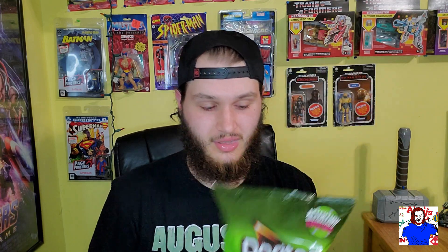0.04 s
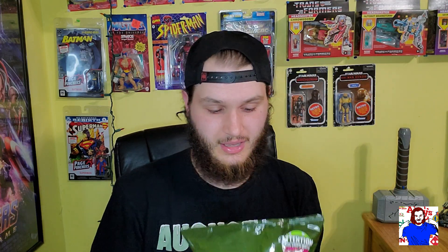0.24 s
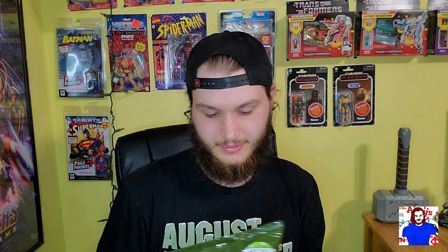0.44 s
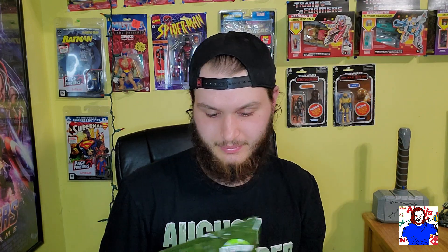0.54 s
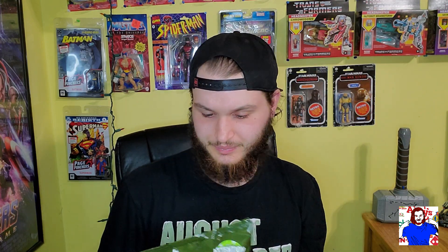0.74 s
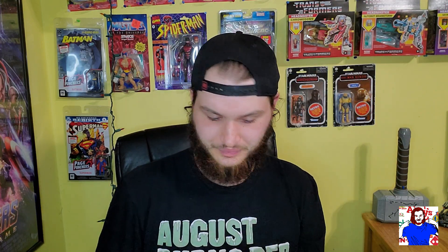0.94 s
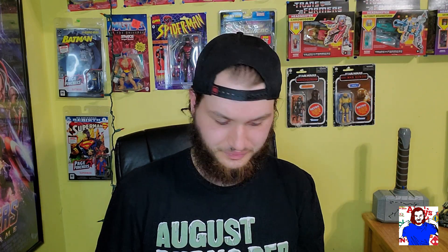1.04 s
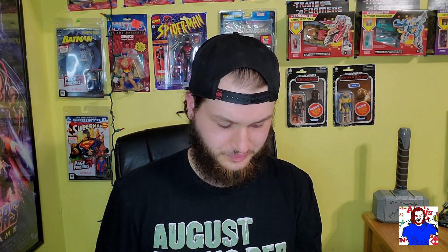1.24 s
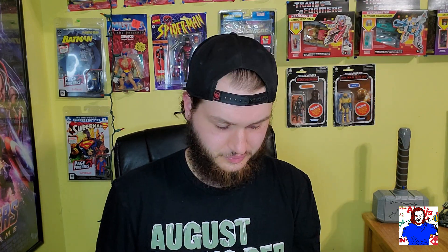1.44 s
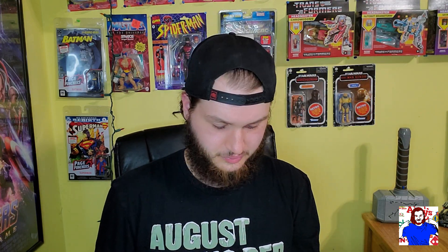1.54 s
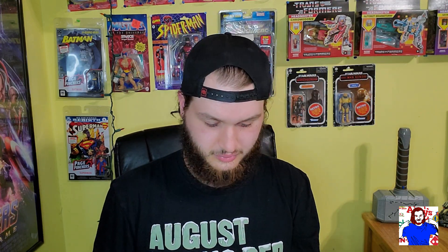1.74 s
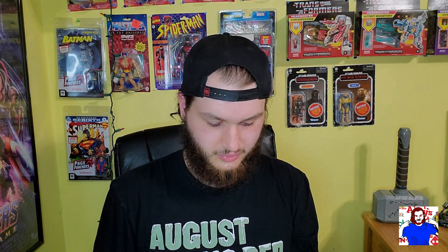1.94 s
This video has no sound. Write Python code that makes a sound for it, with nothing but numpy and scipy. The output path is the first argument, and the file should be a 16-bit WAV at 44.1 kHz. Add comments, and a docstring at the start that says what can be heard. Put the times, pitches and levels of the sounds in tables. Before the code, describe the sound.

A foil snack bag slides softly, then is squeezed in several uneven bursts of sharp crackles, fine rustle and hollow pops, with brief lulls between; close and dry in a small quiet room.

```python
"""Foil snack bag gripped and crumpled

A foil snack bag is lowered and gripped in a few squeezes, close up in a small room.
Creases snap as short noise bursts with a sharp crack, and ringing modes make the panel beside them pop.
Random grains give the crackle of tiny wrinkles and the rustle of the body; whole sides buckle with low pops.
Decaying sines ring as taut facets, wavering tones squeak, and soft noise is the slide and the room tone."""
import sys
import numpy as np
from scipy import signal
from scipy.fft import rfft, irfft, next_fast_len
from scipy.io import wavfile

SR = 44100
rng = np.random.default_rng(int(sys.argv[2]) if len(sys.argv) > 2 else 0)


def unload_wav(signal):
    """Save mono or channel-first audio to the path in sys.argv[1] as 16-bit WAV at rate SR, clipped to [-1, 1]."""
    wavfile.write(
        sys.argv[1],
        SR,
        np.round(np.clip(np.atleast_2d(signal).T, -1, 1) * 32767).astype(np.int16),
    )


N = 88200

# Tone of the bag's body, also the spectrum of the squeaks' waver. Each row: frequency in Hz, level in dB.
BODY_TONE = [(25, -46), (70, -13.5), (125, -1), (175, -8), (250, -1), (330, 1.5), (560, 0), (750, -5.5),
             (1300, -8), (2500, -10.5), (6000, -47)]

# Trims added to the levels in the tables, in dB
CRACK_DB, POP_DB, WRINKLE_DB, BODY_DB, BUCKLE_DB, FACET_DB = 1, -3.5, -4.5, -2, 0, -0.5
PUFF_DB = -11.5  # air pushed by a popping panel, relative to the pop
POP_WALLS_DB = -1  # pops carry less into the room than cracks
FIRST_SLIP = 3.7  # size of the slip that starts a snap, relative to the scale of those that follow
PANEL_CYCLES, BUCKLE_CYCLES = 10.8, 9  # cycles in which a mode's decay reaches -60 dB
PANEL_SCATTER = 0.032  # random spread of the mode ratios
PANEL_RISE_CYCLES = 0.23  # time constant of a mode's onset
WRINKLES_PER_S, WRINKLE_SPREAD_DB = 1500, 3.5
FLEXES_PER_S, FLEX_SPREAD_DB = 330, 2.5
GRIP_FADE_S = 0.019  # time constant of the fade outside a level curve
FACET_T60_S = 0.028
SQUEAK_HALF_S, SQUEAK_WOBBLE = 0.0039, .012  # time from peak to 1/e; rms share by which the pitch wavers
NEAR_DB, NEAR_DELAY_S, NEAR_T60_S = -6, .003, 0.044  # near surfaces answer first
WALLS_DB, WALLS_DELAY_S, WALLS_T60_S = -8, .007, .22  # then the walls
FLOOR_DB = -58.5  # rms of the room tone
CEILING = .9  # full-scale limit that rounded peaks approach
CUTOFF_HZ = 15900


def snaps():
    """A crease flips in a burst of slips, with a pop and a puff of air; the walls get an even click."""
    # Each row: start in seconds, crack energy in dB, crack pitch in Hz, its top octave relative to it in dB,
    # crack length in ms (slips down by 4 dB), panel pop energy in dB, panel pitch in Hz,
    # extra level sent to the walls in dB. Crack and pop energies are ahead of their trims.
    snap_rows = [(0.0604, -26.5, 7580, -6, 0.26, -33, 1410, 6), (0.22, -21, 3130, -10, 4.3, -5.5, 880, 8),
                 (0.2316, -12, 2790, -14, 0.3, -6, 1310, 8), (0.2353, -0.5, 4200, -16, 3, -3, 1310, -10),
                 (0.242, 7.5, 5270, -21, 1.2, 0, 1140, 6.5), (0.247, -2, 6090, -9, 0.5, -3, 1010, 8),
                 (0.3314, -15.5, 1690, -20, 1.7, -1.5, 1160, 4),
                 (0.3513, -15.5, 1500, -24, 0.63, -4, 680, -2), (0.359, -31, 1800, -20, 0.8, -8, 900, 2),
                 (0.478, -15, 3500, -7, 2.4, -5, 844, 9), (0.378, -7.5, 2900, -16, 2.5, 2.5, 1270, 4),
                 (0.495, -5.5, 3960, -13, 0.44, 1.5, 790, 4), (0.5191, -9.5, 3650, -10, 2.2, -3, 1290, 8),
                 (0.5339, 0, 3800, -9, 0.76, -6.5, 610, 5), (0.554, 3, 4950, -13, 1.5, 1, 1380, -3),
                 (0.573, -8, 5860, -11, 0.8, -5, 725, 9), (0.5894, -3.5, 5600, -13, 1.3, -7, 850, -10),
                 (0.6197, 6, 5300, -7.5, 0.27, 3.5, 816, 0.5), (0.628, -1.5, 5750, -13, 1.1, -5, 1290, -3),
                 (0.6414, -16, 2800, -14, 1, 2.5, 1030, -8), (0.6345, -5, 6000, -9, 1.0, -5, 730, -7),
                 (0.6508, -4, 6190, -7, 0.23, 0, 554, -7), (0.683, -3.5, 5100, -11, 0.5, 2, 517, -14),
                 (0.6857, -10, 4380, -18, 2.1, -2.5, 740, 7), (0.8074, -13, 5400, -8.5, 0.8, -18, 1470, 7),
                 (0.8435, 6, 3860, -7, 0.23, -4, 1010, 2), (0.8613, 7.5, 3900, -7.5, 1.4, -7, 650, -10),
                 (0.868, 3, 6390, -15, 1.5, 1.5, 457, 4), (0.8868, 6.5, 5280, -14, 3, -18, 615, 1.5),
                 (0.89, -2, 4500, -19, 0.35, 5, 870, 2), (0.9302, -15, 4000, -10, 1.2, -15, 1200, -10),
                 (0.9715, -4, 3800, -10.5, 2.4, -1.5, 1320, 7),
                 (1.0139, -1, 5880, -21, 1.8, -2.5, 754, 2.5), (1.077, -16, 4540, -17, 2, -5.5, 774, -3),
                 (1.145, -24, 1940, -9, 1.6, -12, 470, 15), (1.1578, -14, 5640, -5, 1.1, -14, 746, 10),
                 (1.2093, -20, 3210, -19.5, 0.5, -9, 1520, 3), (1.215, -10.5, 5680, -8, 0.26, -26, 463, -6),
                 (1.242, 3.5, 4470, -6, 0.2, 5, 3400, -3), (1.2635, 3, 5470, -30, 0.24, -12, 880, 7.5),
                 (1.297, 1, 3830, -26, 0.98, 0, 685, 5), (1.3076, -5, 3970, -4, 2.8, 3, 1240, -10),
                 (1.318, 0.5, 3930, -26, 1.2, 5, 714, 4.5), (1.3574, 3.5, 5300, -14, 0.35, 1.5, 910, -16),
                 (1.3714, -2.5, 5300, -12, 0.37, -14, 745, -7), (1.3744, 5.5, 3500, -22, 6, 7, 553, -14),
                 (1.3871, 4.5, 5330, -9, 0.84, 11.5, 1200, -1.5), (1.39, 2, 2760, -5, 0.27, -10, 630, 10),
                 (1.3952, 10, 4130, -15, 0.69, -10, 580, -5.5), (1.4021, -17, 4910, -7, 1.2, 1, 1250, 10),
                 (1.4194, -2, 5920, -8, 0.94, 2.5, 910, -4), (1.4264, 6.5, 5750, -15, 2.5, 5, 1290, 5.5),
                 (1.433, -11, 4910, -8, 1.1, 4, 550, 6), (1.5114, -37, 2680, -31, 1.2, -3, 1460, 12),
                 (1.5404, 4.5, 4930, -20, 0.32, -3, 2080, 2.5), (1.5927, 3, 4530, -13, 1.6, -6.5, 1075, 3),
                 (1.5951, -5, 5420, -21, 1, 7.5, 1174, -10), (1.6374, -21, 3450, -16, 1.6, -1.5, 1650, -8),
                 (1.665, -16, 3550, -17, 0.82, 5.5, 1240, 2),
                 (1.6672, -1.5, 3430, -22, 0.97, 4.5, 1300, 8.5), (1.6945, 2, 4030, -5.5, 2, 8, 1580, 2.5),
                 (1.7163, -0.5, 4510, -4.5, 0.5, 7, 1500, -4), (1.7287, 1, 4400, -12, 2.1, 4, 1750, 1.5),
                 (1.7641, -7, 2950, -18, 2.2, 2.5, 780, -1), (1.836, -1, 4100, -33, 0.79, 1, 1380, -0.5),
                 (1.8996, -25, 2810, -20, 1.7, -11.5, 1780, 5.5)]
    # Modes of a panel. Each row: ratio to the panel pitch, level in dB.
    panel_modes = [(0.159, -19.5), (0.332, -12), (0.581, -5.5), (0.879, -3), (1.06, 1.5), (1.35, -5.5),
                   (1.9, -7.5)]
    # Tone of the air in the bag. Each row: frequency in Hz, level in dB.
    puff_tone = [(30, -24), (70, -7), (130, -4), (200, 5), (330, 4.5), (500, 6), (800, -5), (2000, -42),
                 (8000, -62)]
    out = np.zeros(N)
    t = np.arange(SR // 25) / SR
    click = (t == 0) * 1.0
    for s, crack_db, crack_hz, top_db, length_ms, pop_db, panel_hz, walls_db in snap_rows:
        fade = np.exp(-(t * 1000 / length_ms / 1.45) ** 2)
        slips = rng.standard_normal(len(t)) * fade + FIRST_SLIP * click
        crack_gain = from_db(CRACK_DB + crack_db)
        sharp = crack_gain * crack(slips, crack_hz, top_db)
        even = crack_gain * crack(click, crack_hz, top_db)
        puff = rng.choice([-1, 1]) * from_db(PUFF_DB) * unit(colour(click, puff_tone))
        hollow = from_db(POP_DB + pop_db) * (pop(t, panel_hz, panel_modes, PANEL_CYCLES) + puff)
        to_walls = from_db(walls_db) * (even + from_db(POP_WALLS_DB) * hollow)
        add(out, s, in_room(sharp + hollow, to_walls))
    return out


def crack(slips, pitch_hz, top_db):
    """The film's answer to a burst of slips: a broad peak at the crease's pitch and a fizzing top."""
    # Broad peak of the film. Each row: ratio to the crack's pitch, level in dB.
    film_peak = [(.01, -52), (.035, -14.5), (.11, -12), (.27, -4.5), (.55, -1), (1.0, 1), (1.6, -2.5),
                 (2.0, -3), (2.6, -14), (4.0, -23)]
    # Top octave of a crack. Each row: frequency in Hz, level in dB.
    fizz = [(5000, -27.5), (8500, -11), (10500, 7), (13000, 4), (16000, -9.5)]
    spectrum = [(ratio * pitch_hz, db) for ratio, db in film_peak]
    return unit(colour(slips, spectrum)) + from_db(top_db) * unit(colour(slips, fizz))


def pop(t, pitch_hz, modes, cycles):
    """A panel swings to a new shape and its modes ring for a few cycles; energy 1."""
    out = 0
    for ratio, db in modes:
        hz = pitch_hz * ratio * np.exp(PANEL_SCATTER * rng.standard_normal())
        swing = (1 - np.exp(-t * hz / PANEL_RISE_CYCLES)) * from_db(-60 * t * hz / cycles)
        # the slope of the motion is what sounds
        ring = np.diff(swing * np.sin(2 * np.pi * (hz * t + rng.random())), prepend=0)
        out = out + from_db(db) * unit(ring)
    return unit(out)


def rustle(count=3):
    """Bright ticks of small wrinkles and duller flexes of the body, from a few patches that follow the hands."""
    # How hard the bag is worked, one curve per grip. Each row: time in seconds,
    # level of the wrinkles in dB, level of the body's rustle in dB, both ahead of their trims.
    grips = [
        [(.218, -44, -53.5), (.24, -23, -25.5), (.255, -37, -34), (.29, -43, -39), (.35, -42, -44.5),
         (.44, -41.5, -46)],
        [(.46, -34.5, -38), (.52, -27.5, -30.5), (.63, -23.5, -28.5), (.71, -32.5, -36), (.79, -37.5, -48.5)],
        [(.81, -33.5, -42), (.865, -25, -25.5), (.91, -30, -61), (.96, -38.5, -38.5), (1.04, -41.5, -38),
         (1.11, -47.5, -50.5)],
        [(1.15, -43, -48), (1.23, -44.5, -39), (1.28, -29.5, -33.5), (1.36, -40, -28.5), (1.405, -18, -19),
         (1.44, -21, -32), (1.475, -31.5, -39)],
        [(1.55, -38, -54), (1.62, -31.5, -38), (1.69, -49, -33), (1.74, -38, -61), (1.81, -66, -40),
         (1.92, -68, -53.5)],
    ]
    # Tone of the small wrinkles. Each row: frequency in Hz, level in dB.
    wrinkle_tone = [(40, -60), (400, -18), (1200, 6), (2200, 2.6), (3500, 1), (5500, -1), (7800, 0),
                    (10000, -10), (13000, -6.5), (16000, -13)]
    out = np.zeros(N)
    wrinkling = np.max([level(grip, 1) for grip in grips], axis=0)
    flexing = np.max([level(grip, 2) for grip in grips], axis=0)
    for patch in range(count):
        ticks = grains(WRINKLES_PER_S / count, WRINKLE_SPREAD_DB)
        wrinkles = from_db(WRINKLE_DB) * wrinkling * unit(colour(ticks, wrinkle_tone))
        flexes = grains(FLEXES_PER_S / count, FLEX_SPREAD_DB)
        body = from_db(BODY_DB) * flexing * unit(colour(flexes, BODY_TONE))
        add(out, 0, in_room(wrinkles + body, wrinkles + body))
    return out * np.sqrt(N / count)  # from energy 1 per patch to a joint rms


def grains(per_s, spread_db):
    """Random clicks of either sign, many small and few large."""
    sizes_db = spread_db * np.minimum(rng.exponential(1, N), 4)
    sizes = from_db(sizes_db) * rng.choice([-1, 1], N)
    return sizes * (rng.random(N) < per_s / SR)


def buckles():
    """A whole side of the bag buckles with a large, low, hollow pop."""
    # Each row: start in seconds, energy in dB ahead of the trim, pitch in Hz.
    buckle_rows = [(0.227, -11, 166), (0.243, -7, 239), (.332, -13, 480), (.494, -12, 404), (.533, 1, 500),
                   (.693, -5, 525), (.859, 5, 326), (.886, 4, 302), (0.9, -7.5, 192), (.948, -7.5, 245),
                   (1.076, -7, 326), (1.146, -12.5, 260), (1.254, -5.5, 390), (1.278, -8, 395),
                   (1.298, 0, 377), (1.343, -7.5, 320), (1.374, 4, 330), (1.396, 4, 373), (1.429, 0.5, 406),
                   (1.544, -13.5, 254)]
    # Modes of a side. Each row: ratio to the buckle's pitch, level in dB.
    side_modes = [(.42, -12), (.85, -2.5), (1.02, 2.5), (1.4, -14.5), (1.75, -8.5)]
    out = np.zeros(N)
    t = np.arange(SR // 10) / SR
    for s, db, pitch_hz in buckle_rows:
        thump = from_db(BUCKLE_DB + db) * pop(t, pitch_hz, side_modes, BUCKLE_CYCLES)
        add(out, s, in_room(thump, from_db(POP_WALLS_DB) * thump))
    return out


def facets():
    """Taut facets beside a crease ring briefly as decaying sines, each at its own pitch."""
    # Each row: start in seconds, energy in dB ahead of the trim, pitch in Hz.
    facet_rows = [(.242, 6, 1150), (.351, -10, 553), (.379, -5, 1790), (.382, -4.5, 660), (.535, -2.5, 564),
                  (.861, 1.5, 1310), (.861, 5, 2600), (.887, -6, 1285), (1.014, -5, 790), (1.3185, 4, 2050),
                  (1.376, -9, 560), (1.593, -1.5, 1196), (1.597, -5.5, 710), (1.694, 2.5, 1870),
                  (1.7655, 1, 682), (1.7641, -3.5, 1915), (1.836, -4.5, 2060)]
    out = np.zeros(N)
    t = np.arange(SR // 20) / SR
    for s, db, pitch_hz in facet_rows:
        tone = np.sin(2 * np.pi * pitch_hz * t) * from_db(-60 * t / FACET_T60_S)
        ring = from_db(FACET_DB + db) * unit(tone)
        add(out, s, in_room(ring, from_db(POP_WALLS_DB) * ring))
    return out


def squeaks():
    """The foil sticks and slips on a finger: tiny tones of wavering pitch."""
    # Each row: time of the peak in seconds, peak level in dB, pitch in Hz.
    squeak_rows = [(.761, -36, 3980), (.963, -36, 4210)]
    out = np.zeros(N)
    t = np.arange(N) / SR
    for s, db, pitch_hz in squeak_rows:
        hz = pitch_hz * (1 + SQUEAK_WOBBLE * hiss(BODY_TONE))
        swell = np.exp(-((t - s) / SQUEAK_HALF_S) ** 2)
        out += from_db(db) * swell * np.sin(2 * np.pi * np.cumsum(hz) / SR)
    return in_room(out, out)


def slide():
    """The bag slides softly through the fingers as it is lowered: coloured noise under a level curve."""
    # Each row: time in seconds, rms level in dB.
    slide_level = [(0, -59), (.05, -67), (.07, -56), (.13, -48.5), (.22, -53.5), (.3, -76.5)]
    # Tone of the sliding foil. Each row: frequency in Hz, level in dB.
    slide_tone = [(100, -19), (600, -8.5), (1400, -7.5), (1750, 1), (2150, -2.5), (2600, -8), (6000, -11),
                  (14000, -25)]
    return level(slide_level, 1) * hiss(slide_tone)


def room_tone():
    """Steady coloured noise of the quiet room."""
    # Each row: frequency in Hz, level in dB.
    floor_tone = [(20, -28), (40, -40), (62, -8), (100, -15), (200, -27), (600, -30), (2000, -37.5),
                  (8000, -33), (16000, -40)]
    return from_db(FLOOR_DB) * hiss(floor_tone)


def in_room(forward, to_walls):
    """Direct sound, near reflections and the walls' short tail; every call draws echoes of its own."""
    # Colour of the walls' answer. Each row: frequency in Hz, level in dB.
    wall_tone = [(60, -20.5), (300, -2), (1000, -3.5), (3000, -2.6), (7500, 0), (11000, 0.5), (16000, -7.5)]
    near = signal.fftconvolve(forward, echoes(NEAR_DB, NEAR_DELAY_S, NEAR_T60_S))
    walls = signal.fftconvolve(colour(to_walls, wall_tone), echoes(WALLS_DB, WALLS_DELAY_S, WALLS_T60_S))
    out = np.zeros(N)
    for part in (forward, near, walls):
        add(out, 0, part)
    return out


def echoes(db, delay_s, t60_s):
    """A dense, dying train of reflections."""
    t = np.arange(int((delay_s + t60_s) * SR)) / SR
    train = rng.standard_normal(len(t)) * (t > delay_s) * from_db(-60 * t / t60_s)
    return from_db(db) * unit(train)


def hiss(spectrum):
    """Coloured noise of rms 1."""
    return np.sqrt(N) * unit(colour(rng.standard_normal(N), spectrum))


def level(rows, column):
    """A column of dB points as a gain for every sample, fading outside its span."""
    rows = np.array(rows)
    t = np.arange(N) / SR
    outside_s = np.maximum(np.maximum(rows[0, 0] - t, t - rows[-1, 0]), 0)
    return from_db(np.interp(t, rows[:, 0], rows[:, column])) * np.exp(-outside_s / GRIP_FADE_S)


def colour(x, spectrum):
    """Causal (minimum-phase) filter that follows a table of (Hz, dB)."""
    size = next_fast_len(len(x) + 1024) * 2
    hz, db = np.transpose(spectrum)
    log_hz = np.log(np.fft.rfftfreq(size, 1 / SR) + 1)  # +1 keeps 0 Hz finite
    log_gain = np.log(from_db(np.interp(log_hz, np.log(hz), db)))
    # folding the cepstrum onto positive times gives the minimum phase
    cepstrum = irfft(log_gain)[:size // 2]
    cepstrum[1:] *= 2
    response = np.exp(rfft(cepstrum, size))
    return irfft(rfft(x, size) * response)[:len(x)]


def unit(x):
    """Scale to energy 1."""
    return x / np.sqrt(np.sum(x ** 2) + 1e-20)


def from_db(db):
    """Decibels to gain."""
    return 10 ** (np.asarray(db) / 20)


def add(out, s, sound):
    """Mix a sound in at a time in seconds."""
    i = int(np.clip(s * SR, 0, N - 1))
    out[i:i + len(sound)] += sound[:N - i]


def scene():
    """Bag and room tone, the same in both channels."""
    bag = snaps() + rustle() + buckles() + facets() + squeaks() + slide()
    return np.tile(bag + room_tone(), (2, 1))


def record(dry):
    """The highest peaks are rounded and the top is cut."""
    rounded = dry / (1 + (dry / CEILING) ** 6) ** (1 / 6)
    lowpass = signal.ellip(10, .1, 80, CUTOFF_HZ, fs=SR, output="sos")  # .1 dB ripple, 80 dB stop band
    return signal.sosfilt(lowpass, rounded)


dry = scene()
out = record(dry)
unload_wav(out)
```